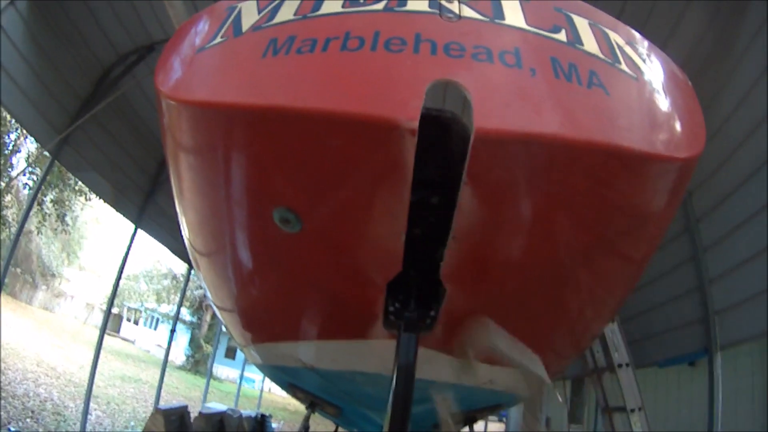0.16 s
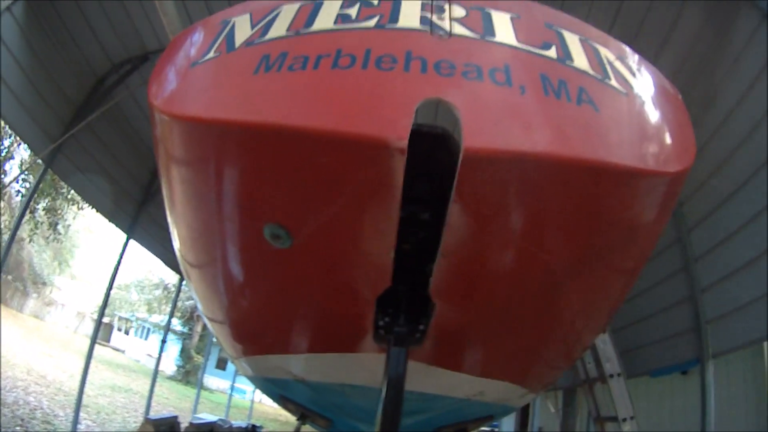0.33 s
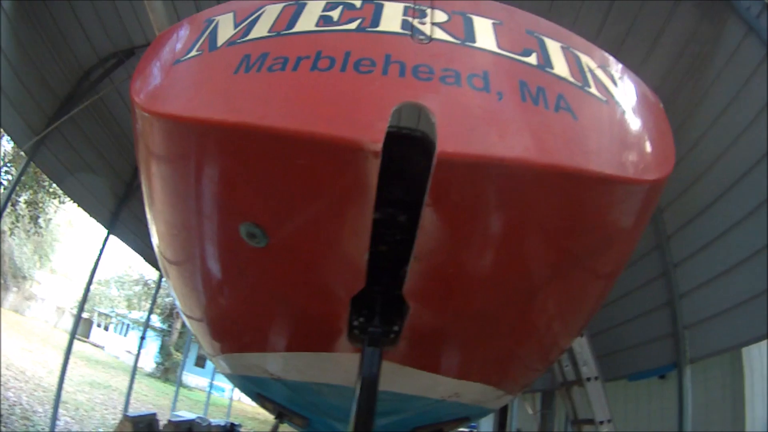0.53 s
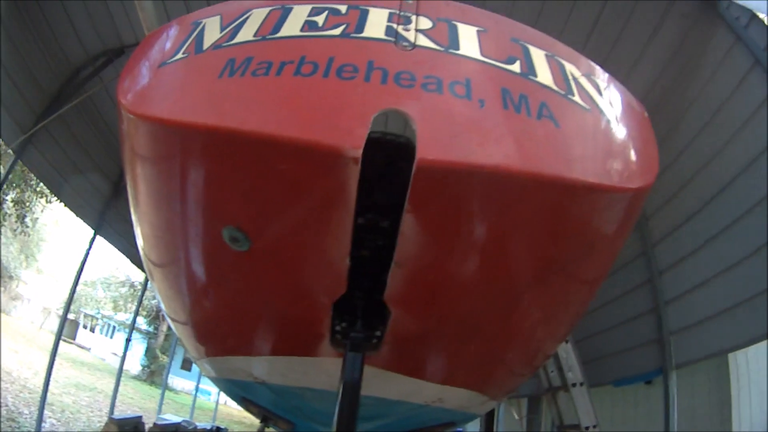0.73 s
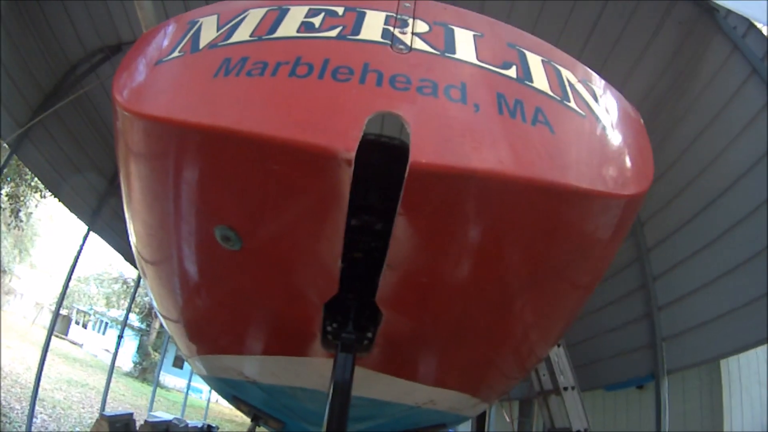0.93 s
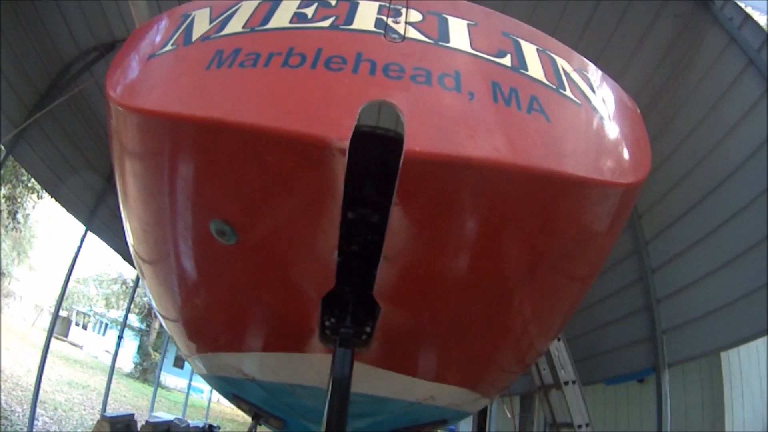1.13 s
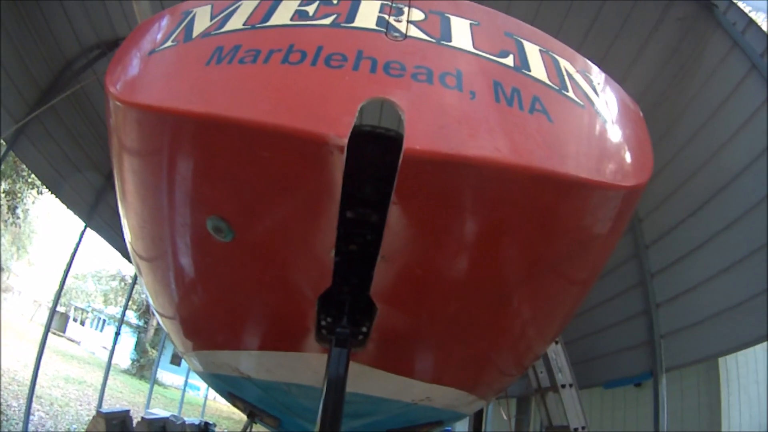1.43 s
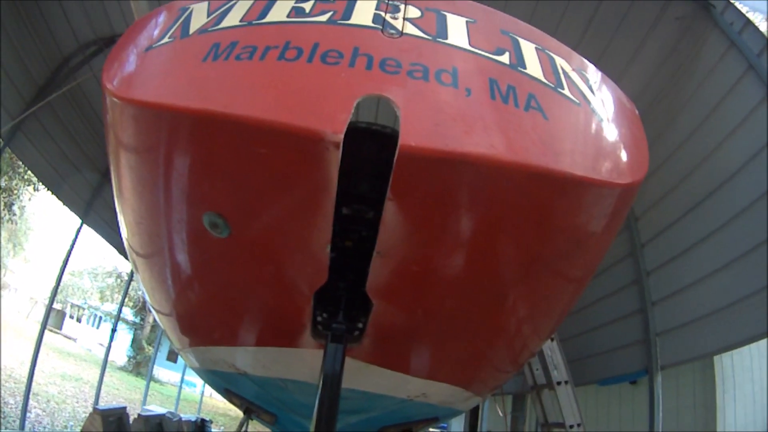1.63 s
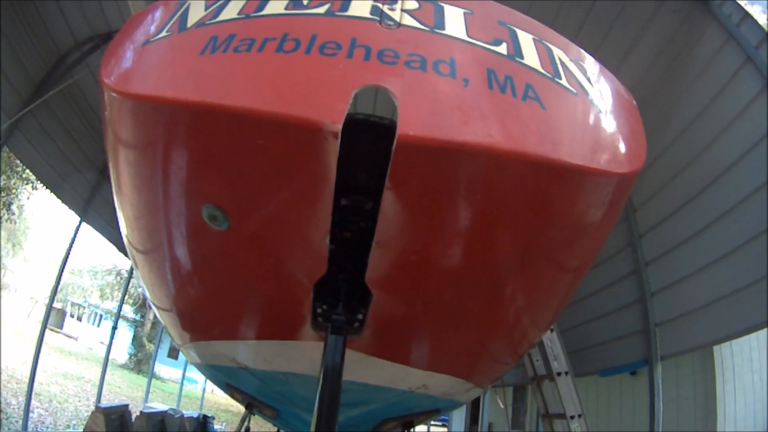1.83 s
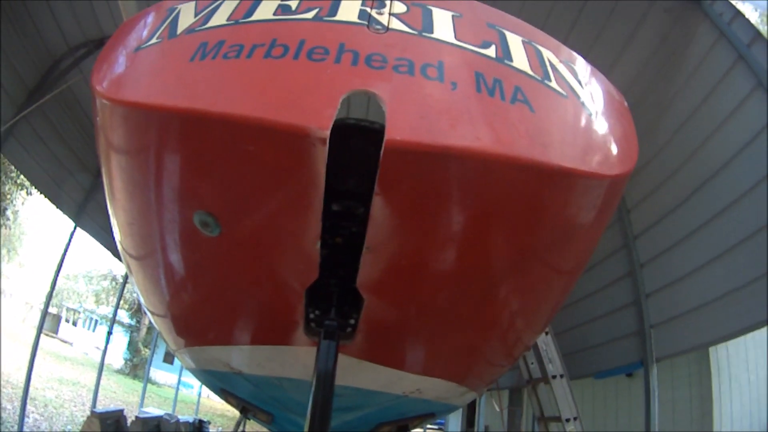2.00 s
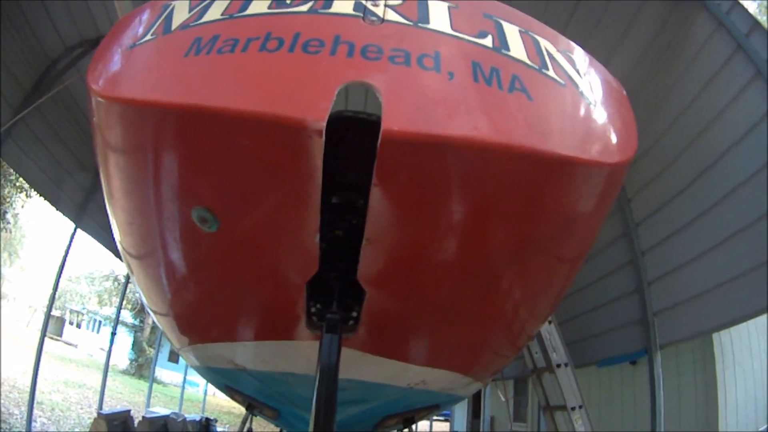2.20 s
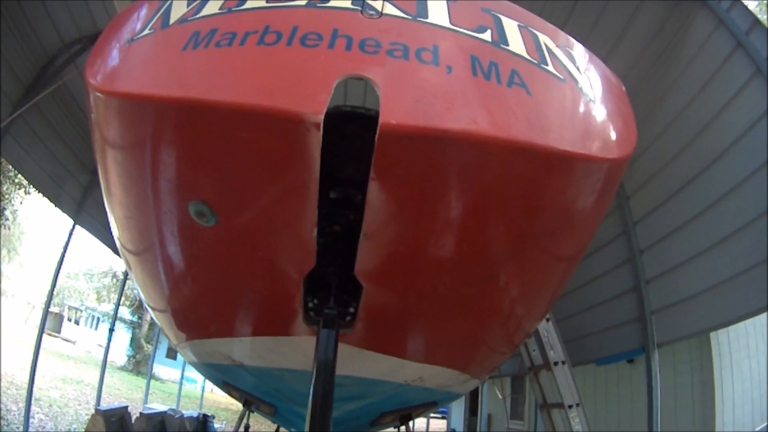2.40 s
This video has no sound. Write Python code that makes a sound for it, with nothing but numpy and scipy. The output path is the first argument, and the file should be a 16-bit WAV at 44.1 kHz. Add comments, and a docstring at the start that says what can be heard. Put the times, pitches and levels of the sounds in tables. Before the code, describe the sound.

Locking pliers snap open with a loud, ringing knock on wood, then tick faintly.

```python
"""Distant machinery hums in a boat shed, then locking pliers snap open with a loud knock.
They grip a wooden template on a boat hull: the lever gives, the jaws fly open and set board and hull
ringing, and the loosened parts bump three times. Later the tool ticks faintly in the hand.
The recorder's gain ducks after the knock, so everything is briefly a little quieter."""
import sys
import numpy as np
from scipy import signal
from scipy.fft import rfft, irfft
from scipy.io import wavfile
from scipy.ndimage import uniform_filter1d

SR = 44100
rng = np.random.default_rng(int(sys.argv[2]) if len(sys.argv) > 2 else 0)


def unload_audio(sound):
    """Save the sound as a 16-bit wav file, at the path given as the first command line argument."""
    columns = np.transpose(np.atleast_2d(sound))
    # keep every value between -1 and 1, then stretch to whole-number steps
    steps = np.round(np.clip(columns, -1, 1) * 32767)
    wavfile.write(sys.argv[1], SR, steps.astype(np.int16))


N = 112454


def from_db(db):
    """Turn decibels into a volume multiplier."""
    return 10 ** (np.asarray(db) / 20)


def rms_one(x):
    """Scale a sound so its average strength (rms) is 1."""
    return x / np.sqrt(np.mean(x ** 2) + 1e-20)


def in_time(rows):
    """Join (time, value) points with straight lines."""
    return np.interp(np.arange(N) / SR, *np.transpose(rows))


def at_hz(points, hz):
    """Read between (frequency, value) points, with octaves evenly spaced."""
    frequencies, values = np.transpose(points)
    return np.interp(np.log(hz + 1e-9), np.log(frequencies), values)


def add(out, start_s, sound):
    """Mix a sound in at its start time."""
    i = int(start_s * SR)
    out[i:i + len(sound)] += sound[:N - i]


def ring(t, hz, fade_s):
    """One fading tone. A fade time is how long a sound takes to drop by 60 dB."""
    return np.sin(2 * np.pi * hz * t) * from_db(-60 * t / fade_s)


def dying(t, rise_s, fade_s):
    """A volume curve that swells quickly, then dies away."""
    return (1 - np.exp(-t / rise_s)) * from_db(-60 * t / fade_s)


def coloured(db_at, size):
    """Noise whose balance of low and high follows the curve db_at(frequency)."""
    hz = np.arange(size // 2 + 1) * SR / size + 1
    return rms_one(irfft(rfft(rng.standard_normal(size)) * from_db(db_at(hz)), size))


def filtered(x, kind, hz, order=2):
    """Keep the "low" part, the "high" part or one "band" of a sound."""
    return signal.sosfilt(signal.butter(order, hz, kind, fs=SR, output="sos"), x)


# Tone colour of the hiss: (frequency [Hz], relative level [dB])
MIC_HISS = [(1200, -38), (2000, -5.5), (3000, -1), (6000, -3.5), (11000, -3), (14500, -9)]

def microphone_hiss():
    """A microphone makes a faint, steady noise of its own."""
    return from_db(-79.5) * coloured(lambda hz: at_hz(MIC_HISS, hz), N)


# Tone colour of far machinery and open air: (frequency [Hz], relative level [dB])
RUSH_COLOUR = [(25, -19.5), (70, -20), (100, -12.5), (130, -7), (175, -10.5), (330, -2.5), (550, -4),
               (850, -1.5), (1250, -5.5), (1650, -11.5), (2100, -19.5), (2900, -30), (5000, -33.5),
               (10000, -38), (14500, -44)]
# Loudness of that rush: (time [s], level [dB])
RUSH_LEVEL = [(0, -54.5), (.25, -55.5), (.45, -54.5), (1.3, -57.5), (2.55, -58)]
# Loudness of the machinery's whine: (time [s], level [dB])
WHINE_LEVEL = [(0, -58.5), (.22, -56.5), (.42, -71.5), (1.0, -61.5), (1.35, -72), (1.65, -67), (1.82, -69),
               (2.05, -65.5), (2.3, -74), (2.55, -61.5)]

def distant_machinery():
    """Far-off machines make a dull rush, a wavering whine and a low hum."""
    whine_hz, wander_hz, hum_hz, hum_db = 1223, 3, 69.3, -76.5
    t = np.arange(N) / SR
    wander = coloured(lambda hz: -20 * np.log10(1 + (hz / 15) ** 2), N)
    pitch_hz = whine_hz + wander_hz * wander
    whine = from_db(in_time(WHINE_LEVEL)) * np.sin(2 * np.pi * np.cumsum(pitch_hz) / SR)
    hum = from_db(hum_db) * np.sin(2 * np.pi * hum_hz * t)
    rush = from_db(in_time(RUSH_LEVEL)) * coloured(lambda hz: at_hz(RUSH_COLOUR, hz), N)
    return rush + np.sqrt(2) * (whine + hum)


# How long sound lingers in the shed: (frequency [Hz], fade time [s])
SHED_FADE = [(150, 0.5), (500, 0.25), (1800, 0.45), (4000, .42), (12000, 0.7)]

def shed_tail(t, hz):
    """The volume curve of sound bouncing around the shed, at one frequency."""
    return dying(t, rise_s=0.015, fade_s=at_hz(SHED_FADE, hz))


# High tones of the steel: (frequency [Hz], relative level [dB], fade time [s])
STEEL_TONES = [(5100, -6, 0.0067), (5530, -12, 0.034), (6950, -21, 0.012), (9170, -7.5, 0.039),
               (10400, -4, .02)]
# Ticks of the handled tool: (time [s], level [dB], colour centre [Hz], main tone [Hz], shed tail [dB])
TICKS = [(1.6544, -48, 5500, 2800, -32), (1.6680, -58, 3570, 3470, -17.5), (1.69, -65, 3500, 3380, -25.5),
         (1.7680, -66.5, 10000, 10700, -25), (1.7738, -52, 3540, 3500, -31),
         (1.8513, -49.5, 3060, 2790, -31), (1.9972, -49, 4300, 3580, -33)]

def tool_ticks():
    """Steel parts touch lightly: a few short tones, a scuff and a trace of the shed."""
    width_octaves = 1.2
    out, t = np.zeros(N), np.arange(SR // 2) / SR
    for start_s, db, centre_hz, tone_hz, tail_db in TICKS:
        def colour(hz):
            return -10 * np.log10(1 + (2 * np.log2(hz / centre_hz) / width_octaves) ** 6)
        tone = from_db(-4) * ring(t, tone_hz, fade_s=0.022)
        steel = sum(from_db(level + colour(hz)) * ring(t, hz, fade) for hz, level, fade in STEEL_TONES)
        scuff = from_db(-9.5) * dying(t, rise_s=0.00019, fade_s=0.019)
        tail = from_db(tail_db) * shed_tail(t, centre_hz)
        noise = (scuff + tail) * coloured(colour, len(t))
        add(out, start_s, from_db(db) * (tone + steel + noise))
    return out


def struck(t, tones, rise_s):
    """A struck object rings with its own tones, a little differently on every hit."""
    spread_db = 2.07 * rng.standard_normal(len(tones))
    swell = (1 - np.exp(-t / rise_s)) ** 2
    return swell * sum((-1) ** k * from_db(db + spread_db[k]) * ring(t, hz, fade_s)
                       for k, (hz, db, fade_s) in enumerate(tones))


# Tones of the hull, the last row a faint long steel tone: (frequency [Hz], relative level [dB], fade time [s])
HULL_TONES = [(253, -39.5, .5), (499, -25.5, .27), (696.3, -13.5, 0.29), (1290, -22, .14),
              (1319, -7.5, 0.14), (1770, -31.5, .15), (2064, -34, 0.38), (2080, -53, .85)]

def hull_ring(t):
    """The large hull behind the board takes longer to get going."""
    return struck(t, HULL_TONES, rise_s=0.00303)


# Tones of the wooden template: (frequency [Hz], relative level [dB], fade time [s])
BOARD_TONES = [(350.3, -26, 0.11), (811.5, -11, 0.2), (918, -28.5, 0.18), (996, -17, .12),
               (1186, -15.5, .15), (1392, -24.5, 0.1212), (1503, -24, 0.23), (1810, -27.5, .18),
               (2144, -30, .25)]

def board_ring(t):
    """The clamped board rings almost at once when hit."""
    return struck(t, BOARD_TONES, rise_s=0.0006)


CRACK_HZ = 1530

def crack(t, tilt_db):
    """A sharp pulse with a steel edge, echoing off a near surface. Soft contacts sound duller."""
    width_octaves, edge_octaves_up, echo_s = 0.79, 1.3, 0.013
    click = 1.0 * (t == 0) + 1e-18
    body = filtered(click, "band", CRACK_HZ * 2 ** (np.array([-0.5, 0.5]) * width_octaves))
    top_hz = np.clip(5500 * 2 ** (0.6 * tilt_db), 2500, 12000)
    body = filtered(body, "low", top_hz)
    pulse = from_db(-0.5) * body / np.abs(body).max()
    echo = from_db(-10) * np.interp(t - echo_s, t, pulse, left=0)
    edge = filtered(click, "band", [3500, SR / 4], order=1)
    return pulse + echo + from_db(-22.5 + edge_octaves_up * tilt_db) * edge


# Tone colour of the clatter: (frequency [Hz], relative level [dB])
CLATTER_COLOUR = [(40, -58), (130, -40.5), (300, -11), (600, -4.5), (1000, -6.5), (1400, 1.5), (2100, -10),
                  (3000, -20.5), (3900, -22.5), (5200, -37), (6100, -32), (7500, -42), (11500, -48),
                  (15000, -59)]
# How fast the clatter dies: (frequency [Hz], fade time [s])
CLATTER_FADE = [(150, 0.11), (500, 0.067), (1400, 0.087), (4000, 0.075), (12000, .07)]

def clatter(t, tilt_db, bass_db):
    """Tool and board make so many short tones that they blur into noise, fading band by band."""
    bass_hz, bass_half_width_octaves = 390, 0.7
    edges = np.geomspace(40, 16000, 27)  # bands a third of an octave wide
    centres = np.sqrt(edges[1:] * edges[:-1])
    gains = from_db(at_hz(CLATTER_COLOUR, centres)) * np.sqrt(np.diff(edges))
    treble_db = tilt_db * np.log2(np.maximum(centres / CRACK_HZ, 1))
    # A firm push adds bass.
    push_db = bass_db / (1 + (np.log2(centres / bass_hz) / bass_half_width_octaves) ** 4)
    gains = gains / np.linalg.norm(gains) * from_db(treble_db + push_db)
    spectrum = rfft(rng.standard_normal(len(t)))
    frequencies = np.arange(len(spectrum)) * SR / len(t)
    snap = from_db(-7) * dying(t, rise_s=0.000067, fade_s=0.014)
    out = np.zeros(len(t))
    for low, high, hz, gain in zip(edges, edges[1:], centres, gains):
        band = rms_one(irfft(spectrum * (frequencies >= low) * (frequencies < high), len(t)))
        body = dying(t, rise_s=0.003, fade_s=at_hz(CLATTER_FADE, hz))
        body *= np.linalg.norm(body) / np.linalg.norm(body * band)  # evens out chance loudness
        out += gain * band * (snap + from_db(-8) * body + from_db(-27) * shed_tail(t, hz))
    return out


# Contacts on the board, from the lever's first give to a last light tap: (time [s], crack [dB],
# clatter [dB], board ring [dB], hull ring [dB], treble tilt [dB per octave], bass boost [dB])
BLOWS = [(.5178, -49, -29, -57, -56, -7.5, -10), (.5219, -20, -11.5, -9.5, -19, 0, 4.5),
         (.5368, -36, -24, -11, -25, 7.5, 17), (.5563, 2.5, -2.5, 0, 4, 2.5, 3.5),
         (0.5647, -8, 0, -25.5, -22, -8, -7.5), (.7104, -26, -37, -22.5, -41.5, -4.5, -8),
         (0.7248, -45, -38, -34.5, -33, 4.5, -24), (.7543, -42, -19.5, -27.5, -33, -4.5, -8.5),
         (1.4606, -44.5, -62, -63, -75, -1, -5.5)]

def pliers_snap_open():
    """The jaws fly open and loose parts bump: each contact cracks, clatters and rings board and hull."""
    out, t = np.zeros(N), np.arange(SR) / SR
    for start_s, crack_db, clatter_db, board_db, hull_db, tilt_db, bass_db in BLOWS:
        add(out, start_s, from_db(crack_db) * crack(t, tilt_db))
        add(out, start_s, from_db(clatter_db) * clatter(t, tilt_db, bass_db))
        add(out, start_s, from_db(board_db) * board_ring(t))
        add(out, start_s, from_db(hull_db) * hull_ring(t))
    return filtered(out, "high", hz=280)  # the blows carry little deep bass


def scene():
    """The sources sit in the centre, almost alike left and right; each side has its own hiss."""
    centre = pliers_snap_open() + tool_ticks() + distant_machinery()
    side = from_db(-47) * np.imag(signal.hilbert(centre))  # every wave shifted a quarter cycle
    return np.array([centre + side + microphone_hiss(), centre - side + microphone_hiss()])


def record(dry):
    """The gain drops after a loud sound, waits and recovers; peaks clip and the top treble is cut."""
    threshold_db, depth_db, cutoff_hz = -22.5, 5.5, 16180
    hold_s, recover_s, smooth_s = 0.44, 0.14, 0.022
    t = np.arange(N) / SR
    level_db = 10 * np.log10(np.abs(uniform_filter1d(dry[0] ** 2, size=256)) + 1e-12)
    since_loud_s = t - np.maximum.accumulate(np.where(level_db > threshold_db, t, -10))
    duck_db = depth_db * np.clip(1 - (since_loud_s - hold_s) / recover_s, 0, 1)
    lag = np.exp(-1 / (smooth_s * SR))
    smooth_duck_db = signal.lfilter([1 - lag], [1, -lag], duck_db)
    clipped = np.clip(dry * from_db(-smooth_duck_db), -1, 1)
    return signal.sosfilt(signal.cheby2(12, 80, cutoff_hz, fs=SR, output="sos"), clipped)


dry = scene()
out = record(dry)
unload_audio(out)
```